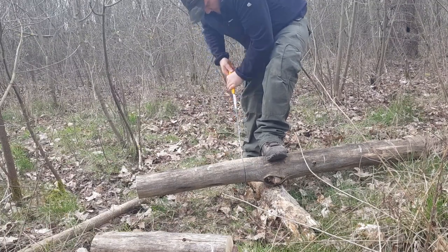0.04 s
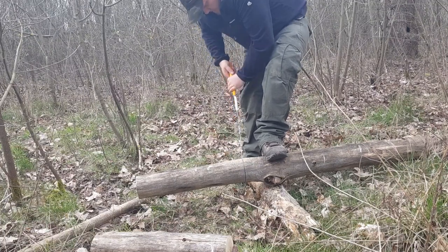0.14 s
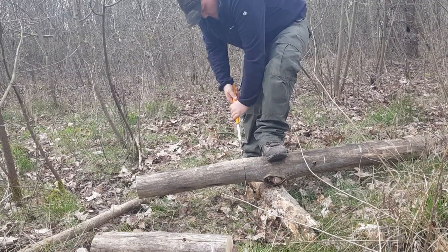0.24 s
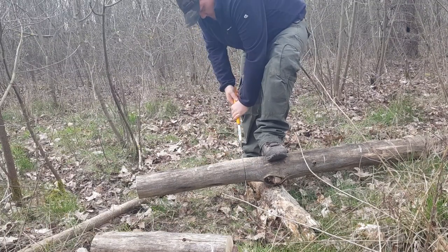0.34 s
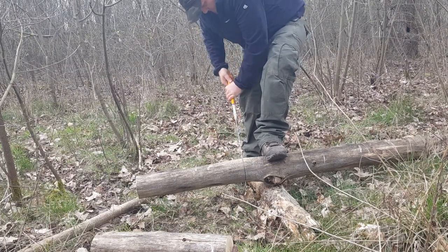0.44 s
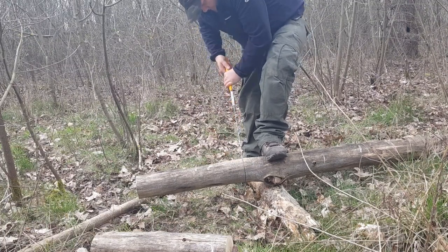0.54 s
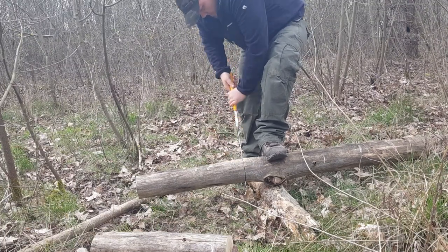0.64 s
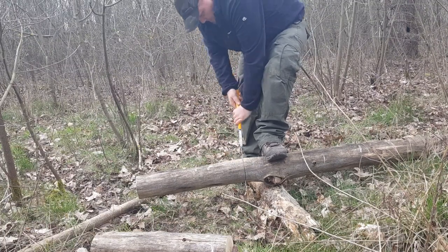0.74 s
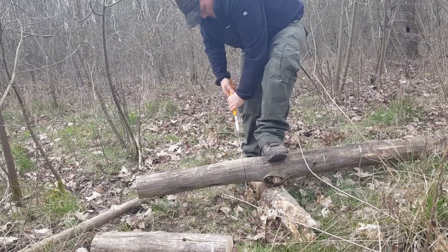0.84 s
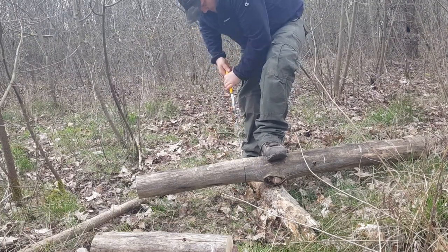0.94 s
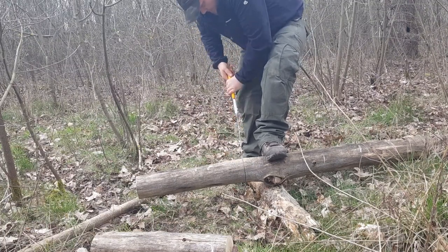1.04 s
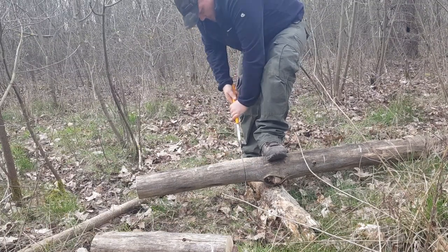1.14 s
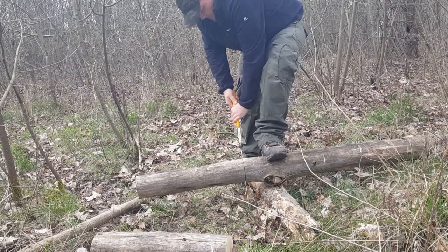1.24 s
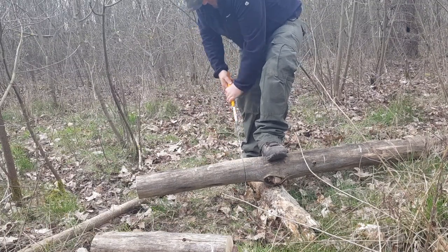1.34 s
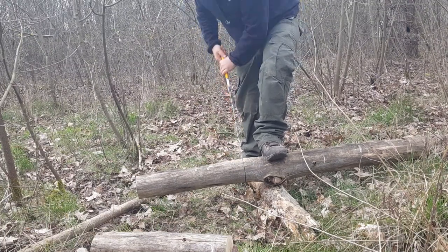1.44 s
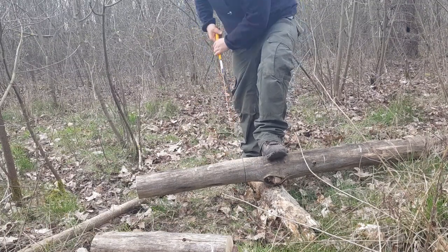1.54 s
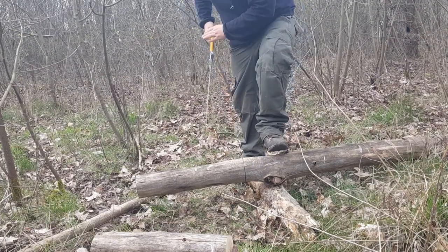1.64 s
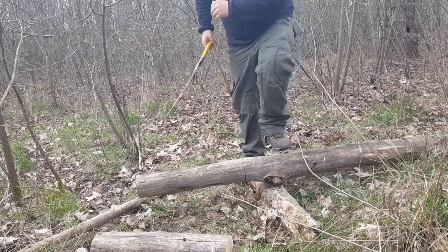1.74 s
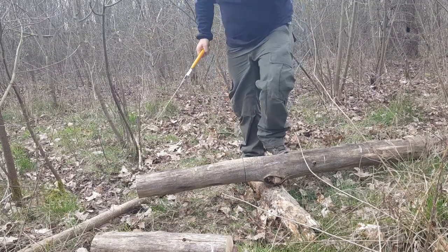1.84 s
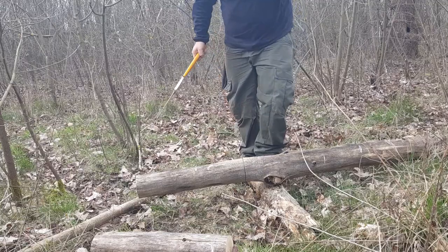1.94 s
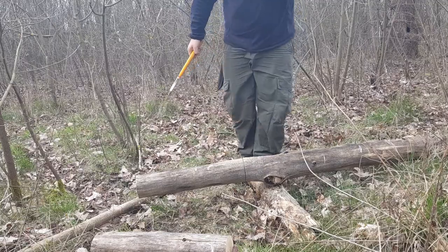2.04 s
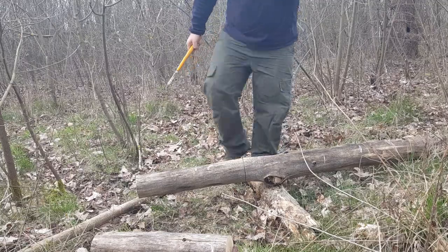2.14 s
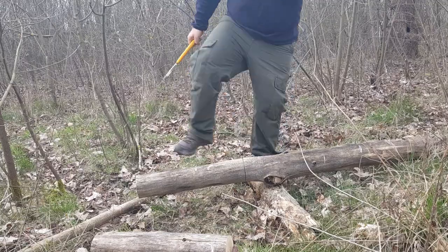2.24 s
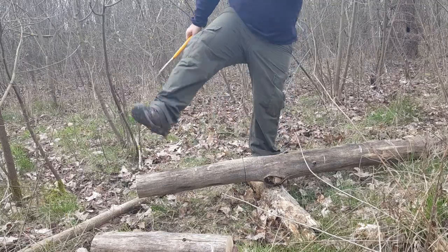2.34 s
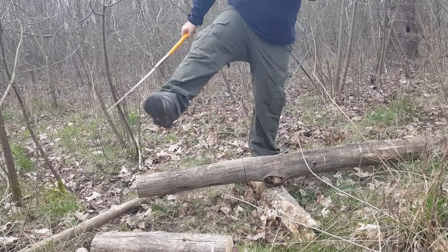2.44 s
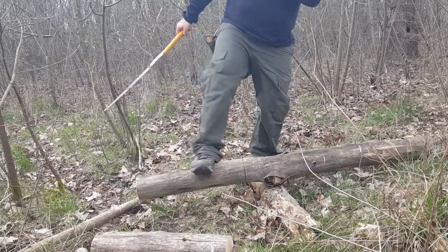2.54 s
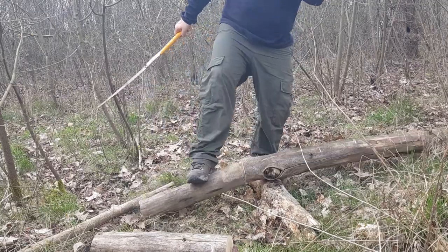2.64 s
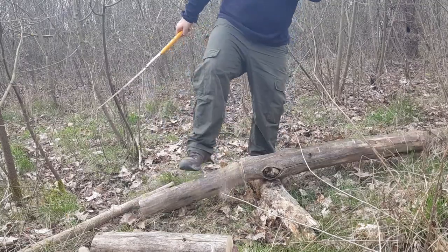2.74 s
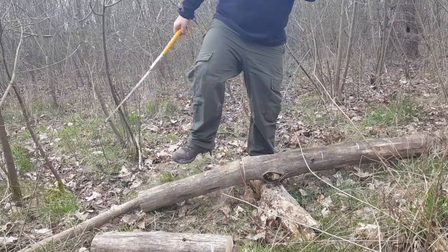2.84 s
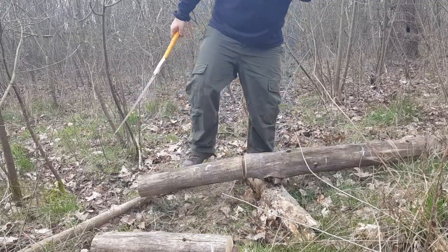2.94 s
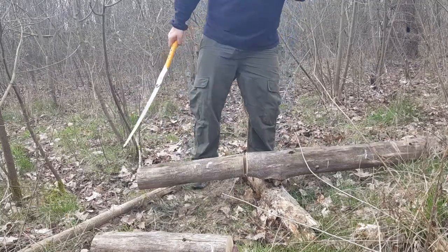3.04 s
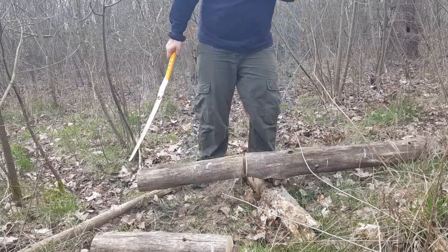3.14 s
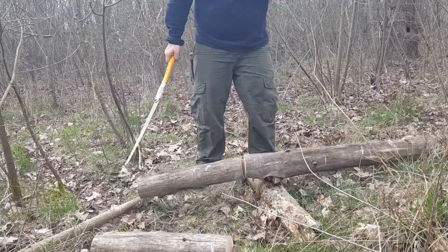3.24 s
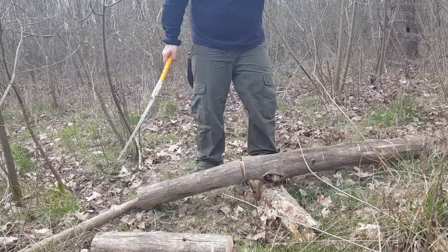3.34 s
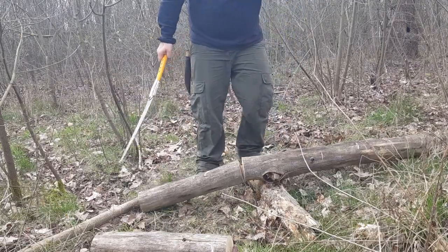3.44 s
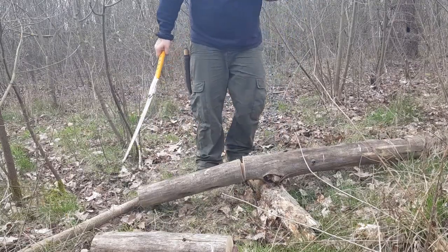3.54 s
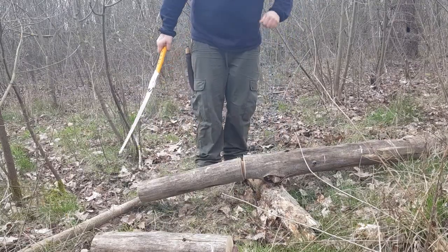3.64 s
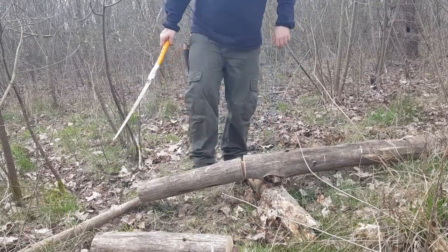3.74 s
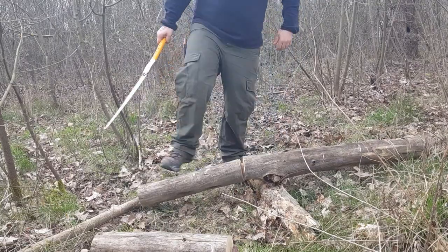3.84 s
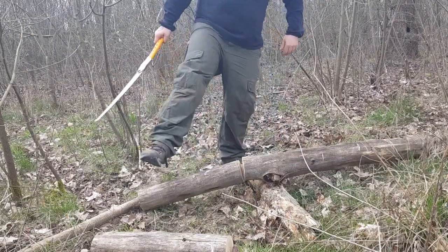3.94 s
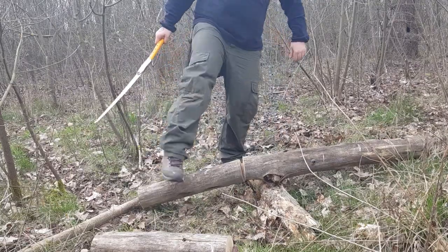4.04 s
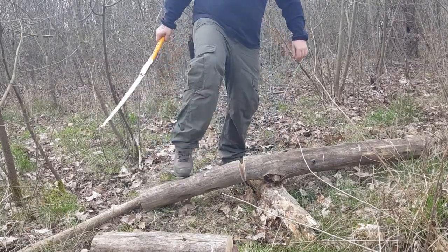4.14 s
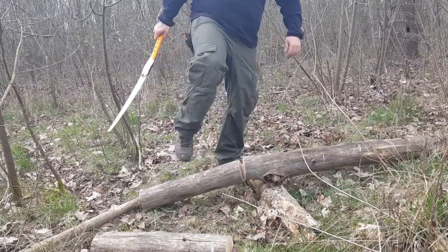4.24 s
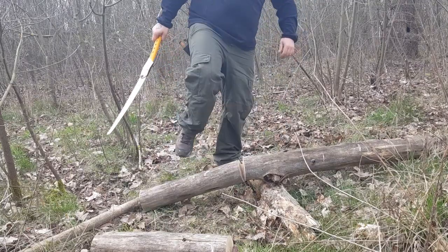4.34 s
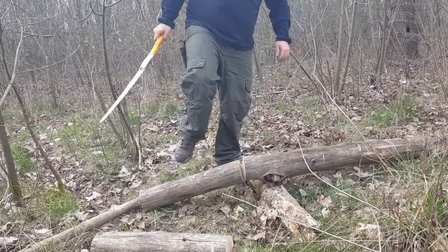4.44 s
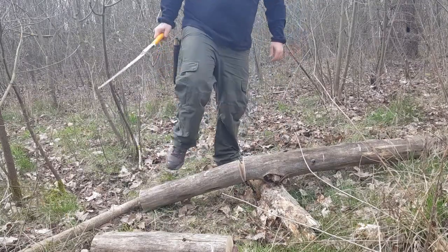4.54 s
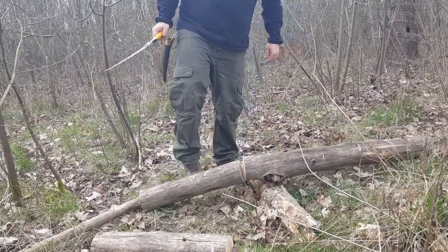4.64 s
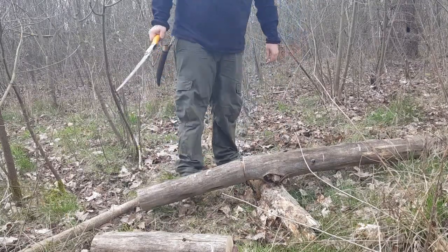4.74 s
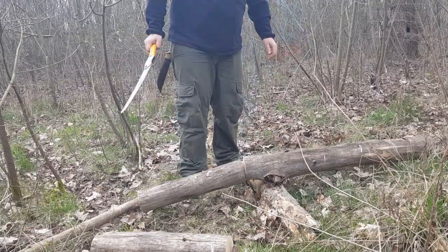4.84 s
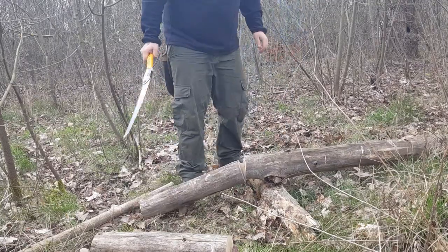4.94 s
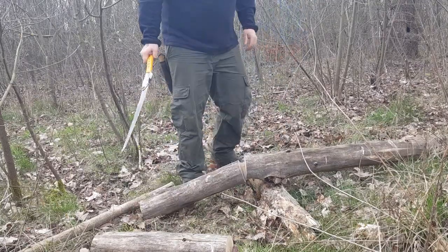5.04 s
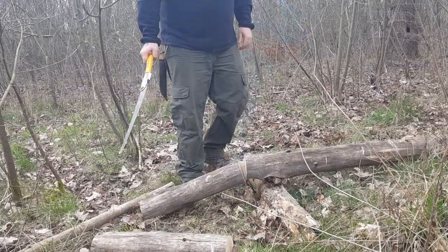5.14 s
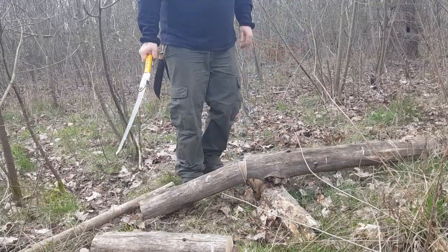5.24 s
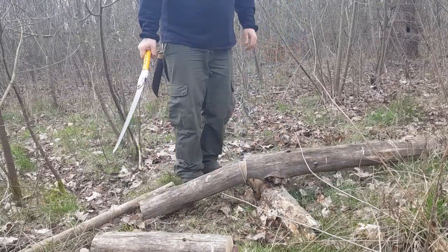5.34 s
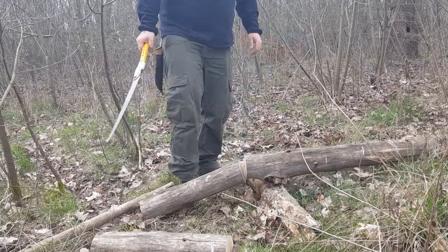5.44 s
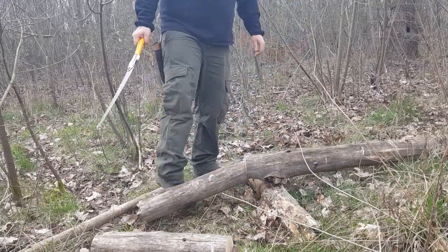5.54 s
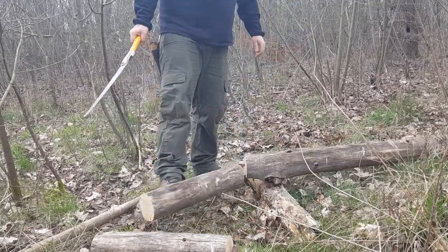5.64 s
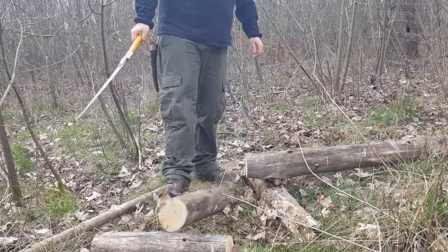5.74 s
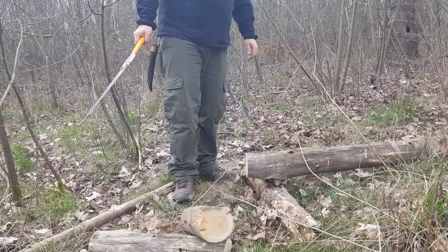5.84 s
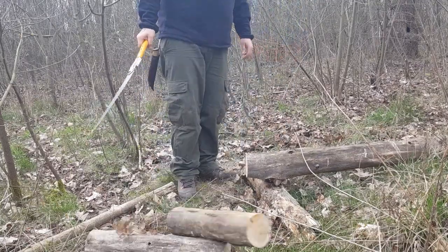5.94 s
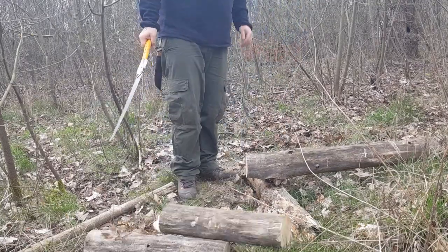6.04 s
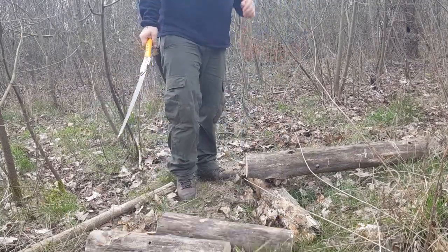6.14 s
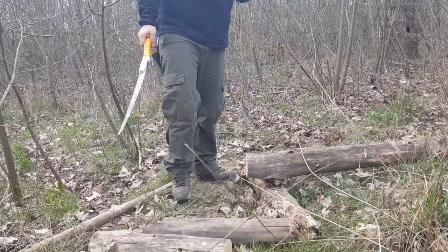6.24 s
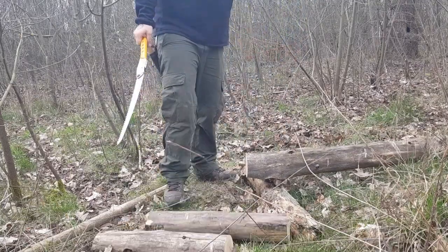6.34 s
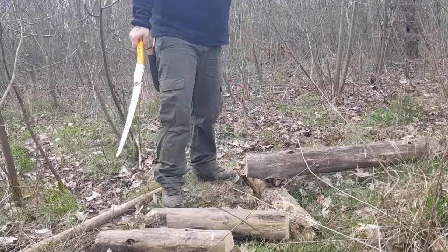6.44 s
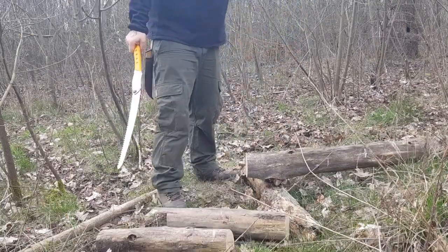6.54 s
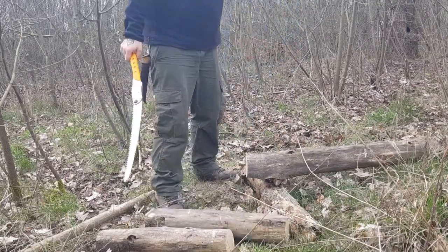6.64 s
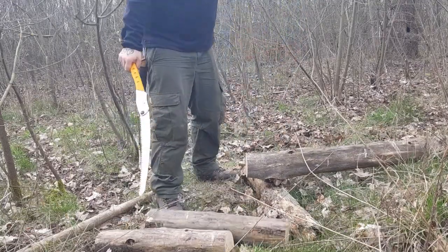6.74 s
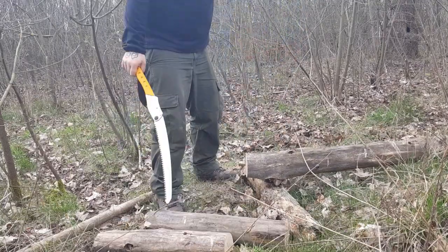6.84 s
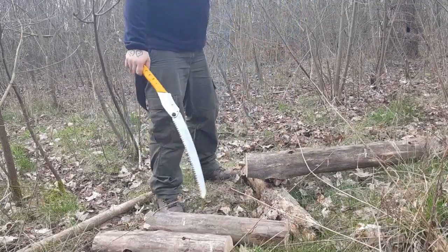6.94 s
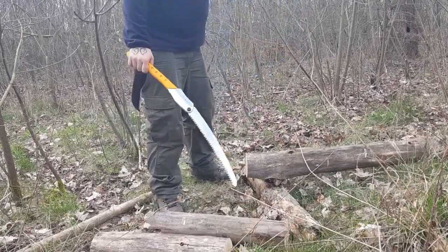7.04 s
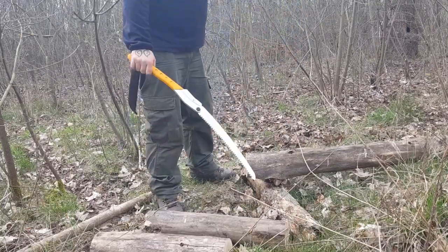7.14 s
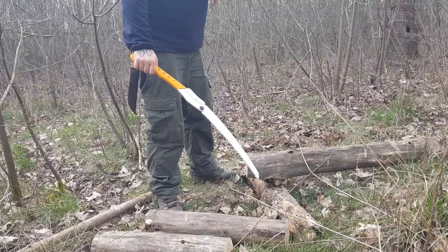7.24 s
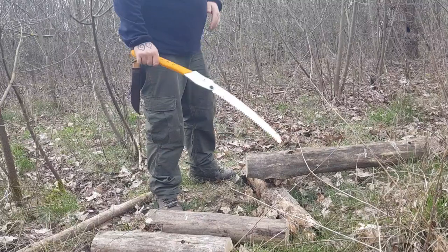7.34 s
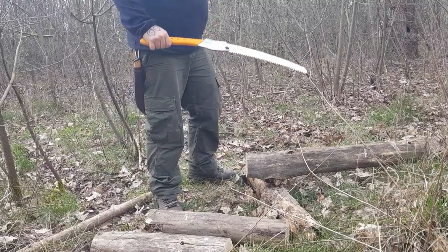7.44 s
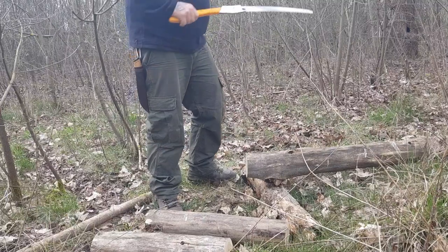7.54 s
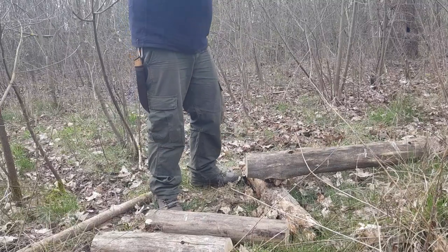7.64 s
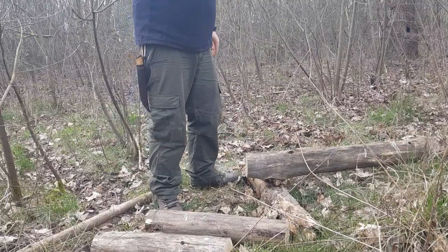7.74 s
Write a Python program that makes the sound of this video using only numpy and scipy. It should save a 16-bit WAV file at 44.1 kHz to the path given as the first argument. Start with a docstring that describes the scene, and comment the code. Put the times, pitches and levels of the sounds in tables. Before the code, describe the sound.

Fast alternating saw strokes, coarse on the pull and softer on the push, end after a second and a half. Leafy footsteps lead to a violent woody crack and brief tearing, then lighter kicks and snaps. A cut log drops with a bright hollow knock, followed by small bumps, crunching leaves and soft boot scuffs. Near stereo microphone, open woods, thin echo from trunks, faint wind.

```python
"""Sawing and kicking a log apart

A long folding saw finishes a cut in a propped log in a bare wood: noise through blade resonances, and a tooth-rate hum.
A boot then kicks the log several times: force pulses excite its modes, while noise bursts snap and crackle tears.
The cut piece drops, knocks on another log and rolls, each bump ringing its modes. Boots shuffle in dry leaves,
made of coloured grains, over a quiet breeze of filtered noise and a far bird of gliding sines."""
import sys
import numpy as np
from scipy import signal
from scipy.fft import rfft, irfft, next_fast_len
from scipy.io import wavfile
from scipy.ndimage import uniform_filter1d

SR = 44100
rng = np.random.default_rng(int(sys.argv[2]) if len(sys.argv) > 2 else 0)


def waveform_to_disk(signal):
    """Save audio, clipped to [-1, 1], as 16-bit WAV at the path in sys.argv[1]."""
    frames = np.transpose(np.atleast_2d(signal))
    scaled = np.clip(frames, -1, 1) * 32767
    samples = np.round(scaled).astype(np.int16)
    wavfile.write(sys.argv[1], SR, samples)


N = 343089  # samples

# Vibration modes of the log. Each row: frequency in Hz, relative level in dB, free ring time T60 in seconds.
LOG_MODES = [(77, 8.5, 0.23), (131, 10, 0.17), (201, 1.5, 0.08), (242.3, 3.5, 0.4), (343, -3.5, 0.18),
             (585, -8, 0.21), (1222, 2, 0.093), (2007, 0.5, 0.023)]
# Vibration modes of the cut piece. Each row: frequency in Hz, relative level in dB, free ring time T60 in seconds.
PIECE_MODES = [(221, -11.5, 0.011), (510, 11.5, 0.014), (637, -3, 0.033), (975, -12, .09),
               (1074, 13.5, 0.091), (1348, 15, .1), (1484, -12, 0.016), (1740, -3, 0.08)]
# Likeness of near sounds at the two ports. Each row: frequency in Hz, left-right correlation (no unit).
NEAR_LIKENESS = [(100, 0.26), (300, 0.99), (700, 0.57), (1400, 0.68), (3000, 0.36), (6000, 0.052),
                 (12000, 0.051)]


def undb(db):
    """Amplitude ratio from decibels: the inverse of 20 log10."""
    return 10 ** (np.asarray(db) / 20)


def unit(x):
    """Normalise to unit root-mean-square, so that a later gain sets the level."""
    return x / np.sqrt(np.mean(x ** 2))


def read(curve):
    """Gain at every sample, by linear interpolation of a level curve in seconds and dB."""
    return undb(np.interp(np.arange(N) / SR, *np.transpose(curve)))


def on_log_axis(hz, table):
    """Interpolate a spectrum table along a logarithmic frequency axis."""
    table_hz, values = np.transpose(table)
    return np.interp(np.log(hz + 1), np.log(table_hz), values)


def colour(x, table, size=2048):
    """Minimum-phase filter: folding the cepstrum of the gain (Hz, dB) makes its response causal."""
    gain = undb(on_log_axis(np.fft.rfftfreq(size, 1 / SR), table))
    cepstrum = irfft(np.log(gain))
    cepstrum[1:size // 2] *= 2
    cepstrum[size // 2 + 1:] = 0
    response = irfft(np.exp(rfft(cepstrum)))
    return signal.oaconvolve(x, np.atleast_2d(response), axes=-1)[:, :N]


def spread(pair, likeness):
    """Stereo coherence: two unrelated draws become mid and side, weighted by likeness in each band."""
    size = next_fast_len(N)
    c = np.clip(on_log_axis(np.fft.rfftfreq(size, 1 / SR), likeness), -.5, 1)
    mid, side = rfft(pair, size) * np.sqrt([(1 + c) / 2, (1 - c) / 2])
    return irfft([mid + side, mid - side], size)[:, :N]


def band(x, hz, width_hz):
    """Second-order resonance: the bandwidth fixes the quality factor."""
    return signal.lfilter(*signal.iirpeak(hz, hz / width_hz, SR), x)


def walk(rate):
    """Band-limited random modulation: normal levels held for 1 / rate seconds, smoothed by two moving averages."""
    hold = int(SR / rate)
    levels = np.repeat(rng.standard_normal(N // hold + 1), hold)
    return uniform_filter1d(uniform_filter1d(levels, hold), hold)[:N]


def swell(s, db, rise_s, fall_s):
    """Exponential envelope: it climbs 20 dB in rise_s to its peak at s, then drops 20 dB in every fall_s."""
    t = np.arange(N) / SR - s
    return undb(db + 20 * np.minimum(t / max(rise_s, .001), -t / max(fall_s, .001)))


def crackle(rate, scatter_db, tail_ms):
    """Shot noise: random clicks of widely scattered size, each decaying as a short burst of noise."""
    sizes = undb(scatter_db * np.minimum(rng.exponential(size=N), 3.5))
    clicks = (rng.random(N) < rate / SR) * sizes
    bursts = signal.lfilter([1], [1, -np.exp(-1000 / (tail_ms * SR))], clicks)
    return unit(bursts * rng.standard_normal((2, N)))


def rubble(events, grains, spectrum, split_hz, span_s=N / SR):
    """Summed grain impacts in one colour, where the band under the split has its own gain in each event."""
    sound = spread(colour(grains, spectrum), NEAR_LIKENESS)
    low = signal.sosfilt(signal.butter(2, split_hz, fs=SR, output="sos"), sound)
    # past its span an event drops 20 dB in every 25 ms
    gains = np.array([np.minimum(swell(*row[:4]), swell(row[0] + span_s, row[1], N, 0.025)) for row in events])
    dull = undb(np.array(events)[:, 4:])
    high_gain = np.linalg.norm(gains, axis=0)  # energies add
    low_gain = np.linalg.norm(gains * dull, axis=0)
    return high_gain * unit(sound - low) + low_gain * unit(low)


def struck(blows, modes, vary_db):
    """Modal synthesis: a smooth force pulse excites damped sines; what stays in touch shortens the ring."""
    out, t = np.zeros(N + SR), np.arange(SR // 2) / SR
    hz, db, t60 = np.transpose(modes)[:, :, None]
    chances = rng.standard_normal((len(blows), len(modes), 1))
    for (s, peak_db, contact_ms, free), chance in zip(blows, chances):
        rings = np.sin(2 * np.pi * hz * t) * np.exp(-np.log(1000) * t / (t60 * max(free, .05)))
        ringing = (undb(db + vary_db * chance) * rings).sum(0)
        # the air hears the rate of change of a bell-shaped contact force
        x = 1000 * t[:SR // 40] / max(contact_ms, .03) - 2.5
        push = -x * np.exp(-x ** 2 / 2)
        sound = signal.oaconvolve(ringing, push)[:len(t)]
        start = int(s * SR)
        out[start:start + len(t)] += sound * undb(peak_db) / np.abs(sound).max()
    return out[:N]


def air():
    """Broadband wind noise: half-octave bands of far rustle flicker independently over a low rumble that gusts."""
    # Rustle spectrum. Each row: frequency in Hz, relative density in dB per Hz.
    rustle = [(15, -47.5), (25, -19.5), (60, 1.5), (100, -5.5), (160, -14), (335, -10.5), (620, -16.5),
              (1400, -29.5), (2600, -30.5), (3700, -30.5), (6500, -28), (8500, -40), (13500, -31),
              (16000, -33.5)]
    # Gusts. Each row: time in seconds, level of the low rumble in dB.
    gusts = [(0.0, -49.5), (0.67, -49.5), (1.1, -51.5), (1.36, -50.5), (1.71, -50.5), (2.66, -49.5),
             (2.95, -61), (3.4, -73.5), (3.72, -61.5), (4.48, -64), (5.37, -53), (6.07, -56.5), (6.78, -59),
             (7.17, -54.5), (7.78, -63.5)]
    # Likeness of far sounds at the ports. Each row: frequency in Hz, left-right correlation (no unit).
    far_likeness = [(100, 0.98), (300, 0.77), (650, 0.24), (1400, 0), (7000, 0.073)]
    rustle_db = -56.5
    far = colour(rng.standard_normal((2, N)), rustle)
    centres = 40 * 2 ** np.arange(0, 9, .5)
    bands = sum(undb(1.9 * walk(2.4)) * band(far, hz, hz / 1.9) for hz in centres)
    rumble = band(band(rng.standard_normal((2, N)), 60, 95.0), 63, 110)
    return spread(undb(rustle_db) * unit(bands) + read(gusts) * unit(rumble), far_likeness)


def blade_speed():
    """Reciprocating motion: the rasp gain follows a blade that leaves rest and returns to it in every stroke."""
    # Saw strokes, pull and push in turn. Each row: start in seconds, length in seconds, rasp level in dB.
    strokes = [(-.03, 0.24, -30.5), (0.219, 0.19, -38.5), (0.393, 0.27, -32.5), (0.67, 0.19, -38),
               (0.845, 0.25, -31.5), (1.101, 0.22, -40), (1.309, 0.27, -33)]
    speed_power, late_peak = 1.14, 1.18  # the fastest moment comes late
    t, gain = np.arange(N) / SR, 0
    for s, length, db in strokes:
        u = np.clip((t - s) / length, 0, 1) ** late_peak
        gain = gain + undb(db) * np.abs(np.sin(np.pi * u)) ** speed_power
    return gain


def saw():
    """Resonant filtering of chip noise by the blade; on the pull, periodic tooth bites also make the log hum."""
    # Rasp spectrum. Each row: frequency in Hz, relative density in dB per Hz.
    rasp_spectrum = [(88, -23.5), (150, -9.5), (303, 1), (457, -11.5), (805, -15.5), (888, -16),
                     (1190, -14), (1720, -14.5), (1940, -13), (4000, -13.5), (5790, -13.5), (6640, -14),
                     (9440, -17), (14800, -13), (16000, -40)]
    # Blade resonances. Each row: frequency in Hz, width in Hz, relative level in dB.
    blade = [(570, 40, -12.5), (1182, 23, -4.5), (1950, 250, -13), (2480, 42, -8), (6410, 180, -9)]
    # Pulls that drive the log. Each row: hardest bite in seconds, hum level in dB, mean tooth rate there in Hz.
    pulls = [(0.093, -32.5, 264.5), (.552, -29.5, 261.4), (0.981, -32, 267.6), (1.44, -38.5, 282.8)]
    bite_rise_s, bite_fall_s = 0.1, .1  # time to move 20 dB
    tooth_climb = .9  # share by which the tooth rate climbs per second of pull
    chips = rng.standard_normal((2, N)) + 0.16 * crackle(1200, 14.0, 1.0)
    ringing_blade = sum(3 * undb(db) * band(chips, hz, width) for hz, width, db in blade)
    rasp = colour(chips + ringing_blade, rasp_spectrum)
    rasp_gain = blade_speed()
    out = rasp_gain * undb(1.67 * walk(70.03)) * spread(unit(rasp), NEAR_LIKENESS)
    for s, hum_db, tooth_hz in pulls:
        hum_gain = swell(s, hum_db, bite_rise_s, bite_fall_s)
        climb = tooth_climb * np.clip(np.arange(N) / SR - s, -.2, .2)
        rate = tooth_hz * (1 + 0.02944 * walk(40.37) + climb)
        phase = np.cumsum(rate) / SR
        teeth = np.exp(1.84 * np.cos(2 * np.pi * phase)) * undb(6.1 * walk(60.4))
        bites = teeth + 3 * rng.standard_normal(N)
        # each bite also scrapes the blade into a puff of its middle modes
        scrape = teeth * rng.standard_normal(N)
        puffs = unit(band(scrape, 1920, 250) + 2.0 * band(scrape, 2710, 270) + 0.62 * band(scrape, 1270, 120))
        out = out + 0.16 * np.sqrt(hum_gain * rasp_gain) * puffs
        out = out + hum_gain * unit(band(bites, 265, 150) + .25 * band(bites, 540, 200))
    return out


def snaps():
    """Impulsive radiation: each snap or crack is a tick, a short ring and a dying noise spray, and jolts the log."""
    # Fibres and twigs snap, and kicks and a knock add short woody cracks. Each row: start in seconds,
    # peak in dB before the brightening filter, ring frequency in Hz, decay time T60 in seconds,
    # spray level relative to the ring in dB.
    cracks = [(0.048, -5.5, 5060, 0.051, -4.5), (2.3215, -32, 6210, 0.071, -19),
              (2.645, -4, 1666, 0.012, -15.5), (2.658, -7, 5600, 0.03, -16.5),
              (2.6683, -16.5, 2030, 0.018, -17.5), (2.6752, -18.5, 2140, 0.044, -27.5),
              (2.6812, -6.5, 1900, 0.019, -25.5), (2.6872, -4, 2400, 0.035, -19),
              (2.693, -4.5, 5000, 0.02, -10), (2.702, -6.5, 2000, 0.019, -10.5),
              (2.7103, -8, 3060, 0.071, -12.5), (2.812, -6.5, 2320, 0.013, -2),
              (3.1507, -36, 2800, 0.033, 6), (3.5275, -55, 8000, .02, -5), (3.7602, -40.5, 8000, 0.02, -2),
              (3.8638, -39.5, 12000, 0.03, -7), (3.887, -46, 1950, 0.03, -2),
              (3.9264, -46.5, 9000, 0.033, -8), (4.0892, -46.5, 9000, .02, -8),
              (4.1762, -33, 2000, 0.03, -35), (4.1938, -19, 12000, 0.015, -9),
              (4.1992, -26, 2100, 0.03, -17), (4.2082, -26, 1600, .03, -25),
              (4.2416, -13.5, 2700, 0.055, -11), (4.801, -32, 2060, 0.033, -31),
              (4.8096, -28, 2030, 0.02, -31), (4.857, -8, 2860, 0.022, -16.5),
              (4.8653, -9.5, 2530, 0.033, -18), (4.8831, -15, 2780, 0.025, 2),
              (5.0186, -30, 4600, 0.061, -12), (5.502, -39.5, 4510, 0.03, -16),
              (5.571, -24, 2030, 0.03, 8.5), (5.6022, -19, 1517, 0.03, -22),
              (5.6168, -21.5, 1806, 0.03, -9.5), (5.6304, -20, 1600, 0.09, -37),
              (5.64, -16, 3200, .05, -5.5), (5.6602, -10, 1700, 0.015, -26),
              (5.6637, -10, 2000, 0.025, -30.5), (5.669, -6, 6000, .025, -10.5),
              (5.709, -20.5, 1664, 0.067, -40.5), (5.8877, -19, 2920, 0.036, -9.5),
              (5.894, -12.5, 6640, 0.042, 3), (6.08, -38, 4770, 0.015, -1),
              (6.2592, -19.5, 2680, 0.018, -6), (6.555, -38, 6000, .04, -5),
              (6.6256, -21.5, 6900, 0.04, -15), (6.6707, -34, 5000, .09, 0), (6.686, -25, 5600, 0.03, -8),
              (6.7436, -34, 1500, .02, -23), (7.0992, -37, 8000, .03, -5), (7.011, -33.5, 2720, 0.09, -39)]
    jolt_db = -21.5  # relative to the crack's peak
    out, t = np.zeros((2, N + SR)), np.arange(SR // 8) / SR
    for s, peak_db, hz, t60, spray_db in cracks:
        fade = np.exp(-t / .0007) + .3 * np.exp(-np.log(1000) * t / max(t60, .003))
        burst = rng.standard_normal((2, len(t))) * fade
        burst[0, :3] -= 2.5  # the tick, on the mid signal
        sound = undb(spray_db) * burst + 1.19 * band(burst, hz, 0.098 * hz)
        start = int(s * SR)
        out[:, start:start + len(t)] += sound * undb(peak_db) / np.abs(sound).max()
    jolts = struck([(s, peak_db + jolt_db, .25, .4) for s, peak_db, *_ in cracks], LOG_MODES, 3)
    bright = colour(out[:, :N], [(300, -13), (1500, -2.5), (3000, 1.5), (8000, 1.0), (15000, 8.5)])
    return jolts + spread(bright, NEAR_LIKENESS)


def leaves():
    """Granular friction: boots and rolling wood stir dry leaves into dense fine grains and sparse coarse ones."""
    # Stirrings. Each row: peak in seconds, level in dB, rise and fall in seconds per 20 dB, dullness (low band) in dB.
    stirs = [(1.7, -61.5, 0.37, 0.43, -3.5), (2.098, -52, 0.11, 0.16, -12), (2.2, -58, 0.2, 0.41, 3),
             (2.326, -51, .03, 0.23, -10), (2.62, -60, 0.45, 0.15, -1.5), (2.76, -55, .05, 1, -8.5),
             (3.158, -69, 0.2, .12, 1), (3.43, -58, 0.038, 0.7, -3), (3.936, -64, .1, 0.37, -15),
             (4.27, -51, 0.071, .25, -8), (4.9, -50, 0.061, 0.047, 3), (5.024, -44.5, 0.087, 0.037, -10.5),
             (5.06, -57, .1, 1., -7), (5.358, -55.5, 0.066, 0.16, -1.5), (5.498, -60, .01, .5, 0),
             (5.575, -40.5, 0.016, .2, -18), (5.72, -54, .05, 0.092, 4), (5.85, -57.5, 0.011, 0.088, -3),
             (5.943, -44.5, 0.035, 0.23, -10), (6.189, -61.5, 0.14, .2, -49),
             (6.253, -37.5, 0.13, 0.052, -8), (6.4, -43.5, 1, .5, -7.5), (6.629, -32.5, 0.0063, 0.017, -17),
             (6.68, -50, .1, 1, -5.5), (7.15, -49, 0.61, 0.24, -4.5), (7.459, -60, 0.034, 1., -35),
             (7.705, -56, .065, 0.27, -10.5)]
    # Leaf spectrum. Each row: frequency in Hz, relative density in dB per Hz.
    leaf_spectrum = [(180, -41), (300, 0.5), (656, -2), (1010, -3.5), (1250, -5), (2740, -2.5),
                     (3760, -4.5), (4300, -1.5), (9240, -3), (15000, 2), (16000, -17.5)]
    grains = crackle(2500, 1.1, 1.0) + 0.65 * crackle(130, 3.2, 4.0)
    return rubble(stirs, grains, leaf_spectrum, 3000)


def bird():
    """Frequency modulation: thin whistles glide and tremble slightly in pitch."""
    # Chirps of a small far bird. Each row: start in seconds, length in seconds,
    # start, middle and end pitch in Hz before the tremble, level in dB.
    chirps = [(1.958, 0.074, 7150, 6840, 6500, -64.5), (3.237, 0.084, 6860, 7170, 6770, -66)]
    out, t = np.zeros(N), np.arange(N) / SR
    for s, length, *hz, db in chirps:
        u = np.clip((t - s) / length, 0, 1)
        pitch = np.interp(u, [0, .5, 1], hz) * (1 + 0.0158 * walk(270))
        out += undb(db) * np.sin(np.pi * u) * np.sin(2 * np.pi * np.cumsum(pitch) / SR)
    return out


def steps():
    """Damped impact: each footfall pushes soft ground into a few low modes."""
    # Footfalls. Each row: start in seconds, peak in dB, contact time scale in ms, share of the free ring time (no unit).
    footfalls = [(2.199, -39, 0.68, 0.68), (2.36, -39.5, 0.12, 0.87), (3.888, -50, 0.44, 0.72),
                 (5.299, -44, 1.24, 1), (6.235, -36, 1.1, 0.28), (6.293, -37.5, 2.2, 0.98),
                 (6.384, -39, 1.6, 0.81), (6.698, -39, 1.1, 0.21)]
    # Ground modes. Each row: frequency in Hz, relative level in dB, free ring time T60 in seconds.
    ground = [(77, -1.5, 0.098), (126, -5, 0.02), (262, -1, 0.05)]
    return struck(footfalls, ground, 3.4)


def kicks():
    """Impulsive excitation: the boot's blows ring the modes of the log, with the opposite polarity to the knocks."""
    # Boot on the log. Each row: start in seconds, peak in dB, contact time scale in ms,
    # share of the free ring time (no unit).
    boot = [(2.6437, -3.5, 0.12, 0.086), (2.6515, -20, 0.26, 0.3), (2.812, -22.5, 0.22, 0.52),
            (4.1685, -33, 0.23, 0.37), (4.177, -32, 0.99, 0.73), (4.8, -23, 0.35, 0.16),
            (4.863, -46, 0.39, 0.71), (5.032, -34, 1, 0.4), (5.601, -21.5, 0.34, 0.16),
            (5.663, -18.5, 0.18, 1)]
    return -struck(boot, LOG_MODES, 3.6)


def tearing():
    """Progressive fracture: the uncut strip of wood tears in a rapid crackle after each kick."""
    # Tears. Each row: peak in seconds, level in dB, rise and fall in seconds per 20 dB, dullness (low band) in dB.
    tears = [(2.66, -17, 0.0053, 0.19, -1.5), (2.692, -25.5, 0.043, .04, -10),
             (2.813, -13.5, .001, 0.0062, -4.5), (4.2, -41, 0.028, 0.27, 0.5),
             (4.243, -42, 0.042, 0.032, -1.5), (4.803, -40, 0.0018, .4, -2.5),
             (4.866, -26.5, 0.026, 0.033, -16), (5.652, -32, 0.061, 0.075, -4.5),
             (5.67, -23.5, 0.037, .045, -5.5)]
    # Tear spectrum. Each row: frequency in Hz, relative density in dB per Hz.
    tear_spectrum = [(180, -40.5), (300, -9), (634, -11), (1120, -18.5), (1250, -5.5), (1410, -15),
                     (1780, -7.5), (2400, -3), (3700, -6), (4750, 0), (8220, -7), (14500, -14),
                     (16000, -15)]
    give_way_s = 0.038  # the strip has given way this long after a peak
    return rubble(tears, crackle(1500, 5.2, 1.0), tear_spectrum, 2603, give_way_s)


def knocks():
    """Collision of solids: the cut piece strikes wood and rings in its own modes."""
    # Strikes. Each row: start in seconds, peak in dB, contact time scale in ms, share of the free ring time (no unit).
    strikes = [(5.630, -40, 0.053, 0.67), (5.664, -12, 0.047, 0.26), (5.678, -25, 0.094, 0.53),
               (5.696, -19, 0.13, 0.64), (5.8878, -2, 0.42, 1), (5.952, -34.5, 0.066, 0.65),
               (5.963, -41, 0.048, 0.98), (6.117, -47, 0.13, .9), (6.131, -45, 0.086, .9),
               (6.146, -45, 0.1, 1), (6.383, -39, .15, 0.44), (6.494, -46, 0.045, .6),
               (6.515, -48, 0.065, 1), (6.557, -47, 0.081, .6), (6.677, -43.5, 0.08, 0.9),
               (7.008, -40.5, 0.36, 0.59), (7.169, -45, 0.23, .8), (7.2, -44, 0.22, 0.78)]
    return struck(strikes, PIECE_MODES, 1.4)


def rolling(count=30):
    """Random impact series: the cut piece bumps over roots and twigs in small damped knocks."""
    first_s, last_s = 6.6, 6.7
    weakest_db, scatter_db, contact_ms = -58.5, 7, 0.18  # contact is scaled by 0.3 to 2.3
    when, size, soft = rng.random((count, 3)).T
    s = first_s + when * (last_s - first_s)
    peak_db = weakest_db - scatter_db * np.log(size)
    bumps = np.transpose([s, peak_db, contact_ms * (.3 + 2 * soft), np.full(count, 0.3)])
    return struck(bumps, PIECE_MODES, 5)


def scuff():
    """Band-limited friction: a boot drags through damp litter in soft grains, without the dry top of leaves."""
    # Drags. Each row: peak in seconds, level in dB, rise and fall in seconds per 20 dB.
    drags = [(6.82, -51.5, .06, 0.16), (7.022, -55.5, 0.16, 0.047), (7.191, -42.5, 0.13, .12)]
    grains = crackle(3000, 1.7, 1.0)
    sound = signal.sosfilt(signal.butter(3, [1500, 7200], "band", fs=SR, output="sos"), grains)
    return sum(swell(*row) for row in drags) * spread(unit(sound), NEAR_LIKENESS)


def trees(near):
    """Diffuse scattering: trunks return a thin tail, modelled by convolution with decaying coloured noise."""
    echo_db, t60_s, gap_s = -16, 0.29, .008
    t = np.arange(SR // 2) / SR
    tail = rng.standard_normal((2, len(t))) * np.exp(-np.log(1000) * t / t60_s) * (t > gap_s)
    tail = colour(tail, [(100, -11.0), (450, -21), (1500, -11), (4000, -9.5), (12000, -11.5)])
    echo = signal.oaconvolve(near, tail / np.linalg.norm(tail[0]), axes=-1)[:, :N]
    return undb(echo_db) * echo


def scene():
    """Superposition: all sources add, and the saw, wood and footfalls also feed the echo."""
    near = saw() + snaps() + steps() + kicks() + tearing() + knocks() + rolling()
    return near + trees(near) + air() + leaves() + bird() + scuff()


def record(dry):
    """Transduction: the ports differ in gain and lose deep bass, saturation rounds peaks and the top is cut."""
    # Port mismatch. Each row: frequency in Hz, left minus right gain in dB.
    mismatch = [(60, -2.5), (110, -1), (200, -2), (380, -1.5), (700, -2.0), (1290, -1), (2380, -1.5),
                (4400, 0), (8120, -4), (15000, -5.5)]
    bottom_hz, top_hz = 45, 15900
    hz, db = np.transpose(mismatch)
    left = colour(dry[[0]], np.transpose([hz, db / 2]))
    right = colour(dry[[1]], np.transpose([hz, -db / 2]))
    ports = np.vstack([left, right])
    ports = signal.sosfilt(signal.butter(2, bottom_hz, "high", fs=SR, output="sos"), ports)
    rounded = np.tanh(0.72 * ports) / 0.68
    return signal.sosfilt(signal.ellip(10, .2, 70, top_hz, fs=SR, output="sos"), rounded)


dry = scene()
out = record(dry)
waveform_to_disk(out)
```